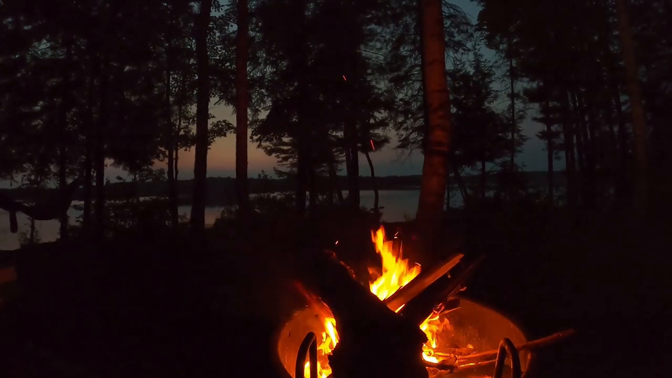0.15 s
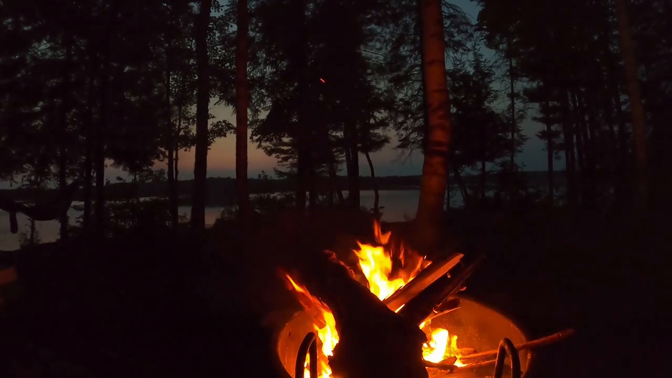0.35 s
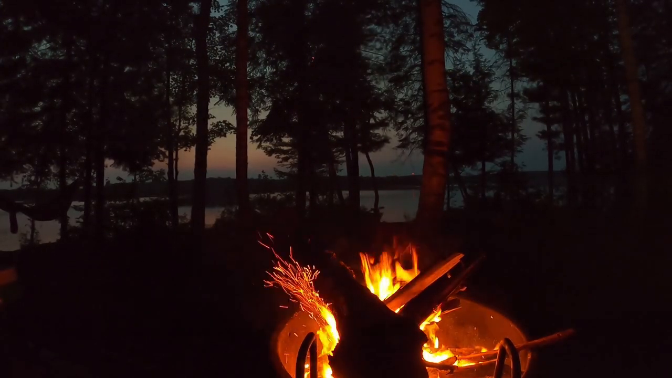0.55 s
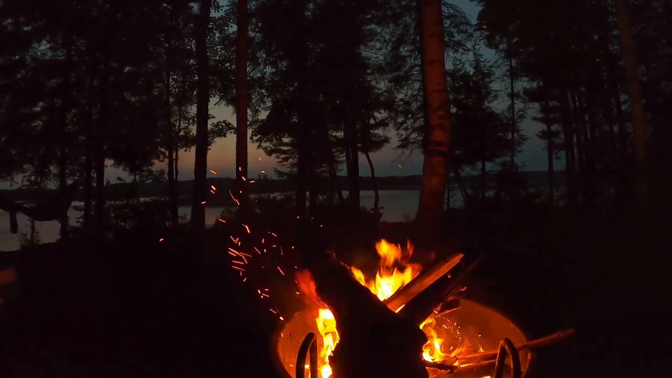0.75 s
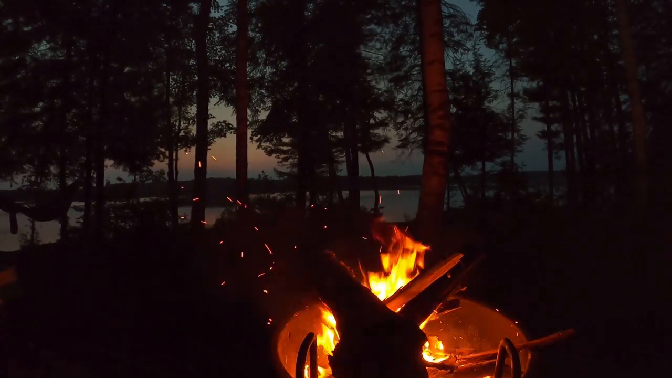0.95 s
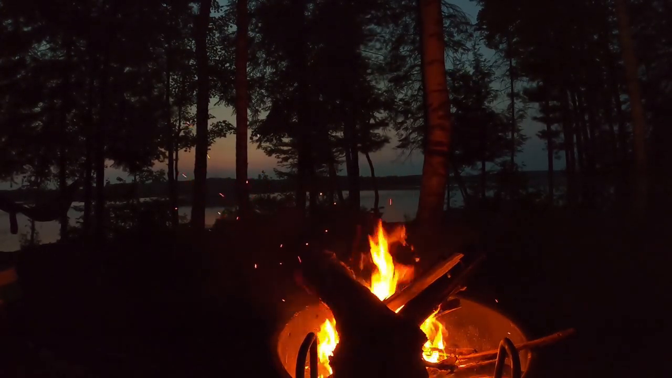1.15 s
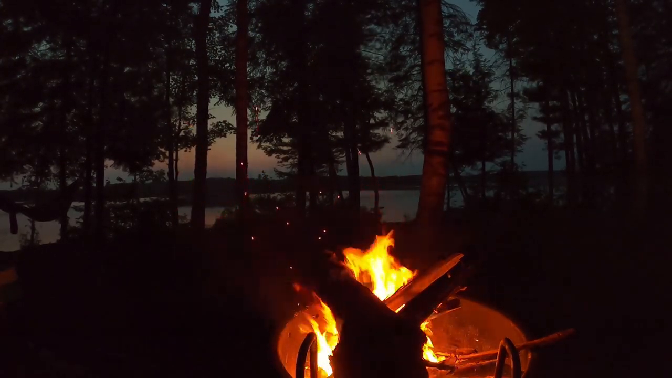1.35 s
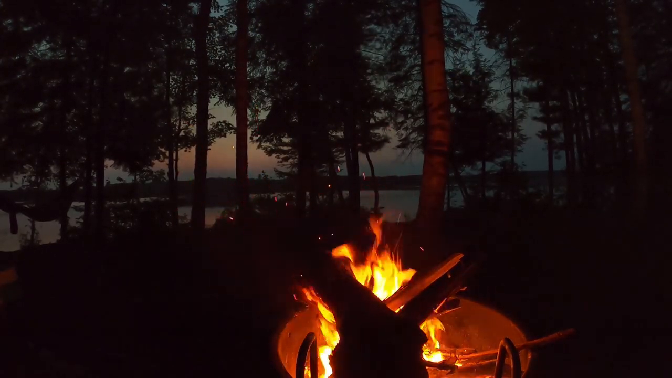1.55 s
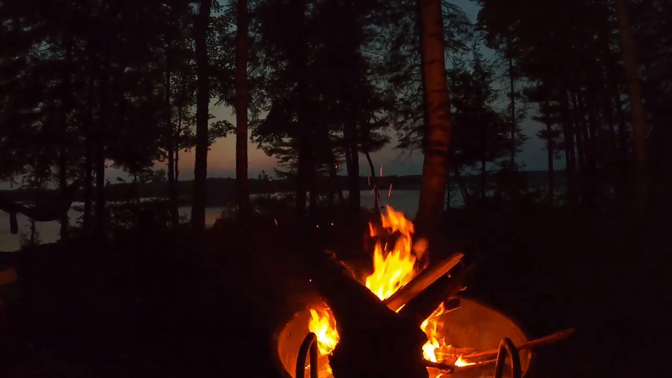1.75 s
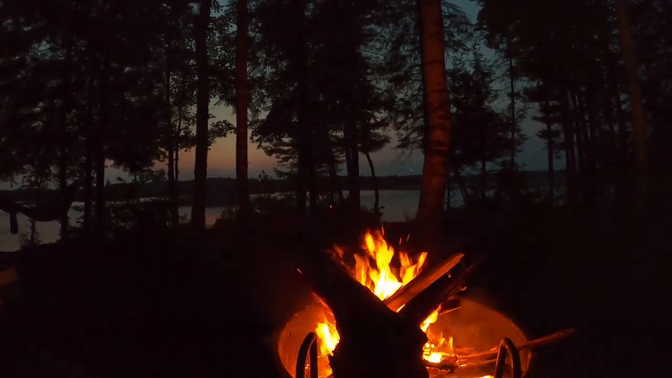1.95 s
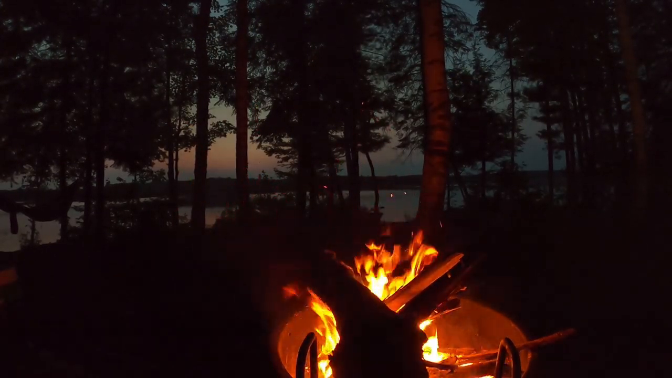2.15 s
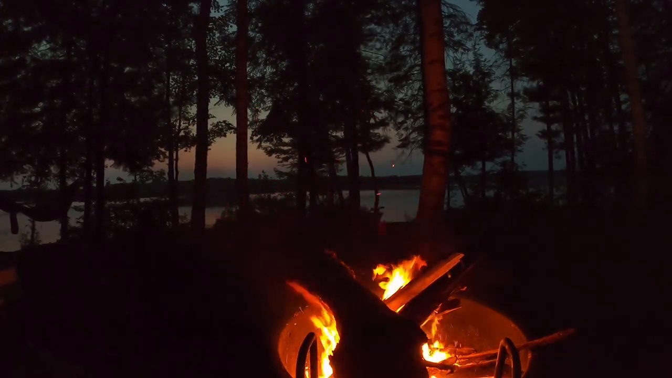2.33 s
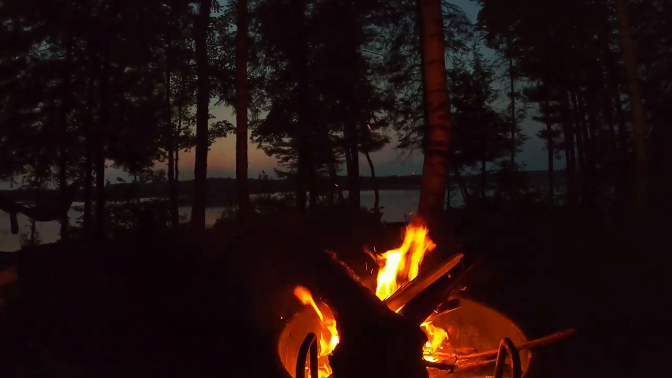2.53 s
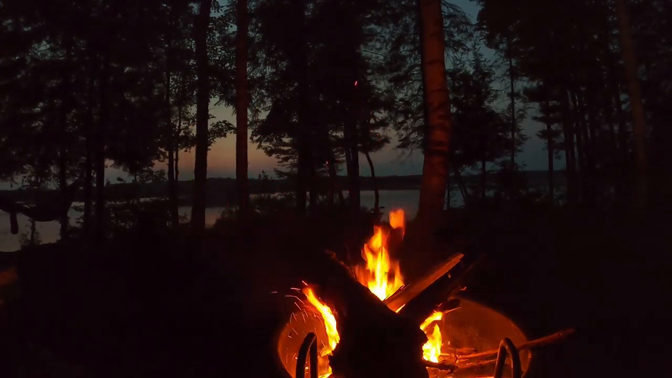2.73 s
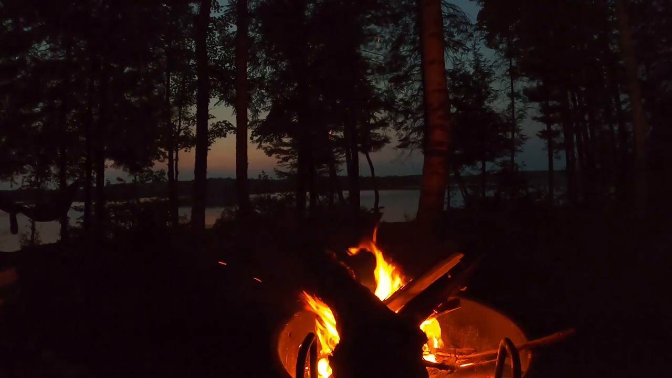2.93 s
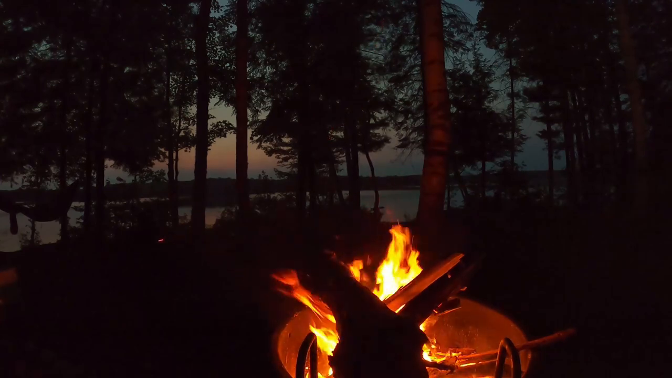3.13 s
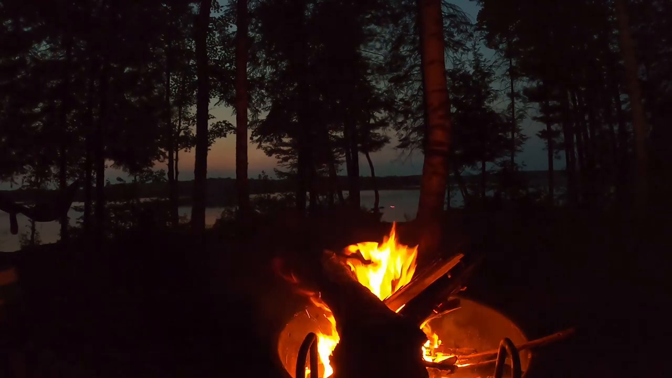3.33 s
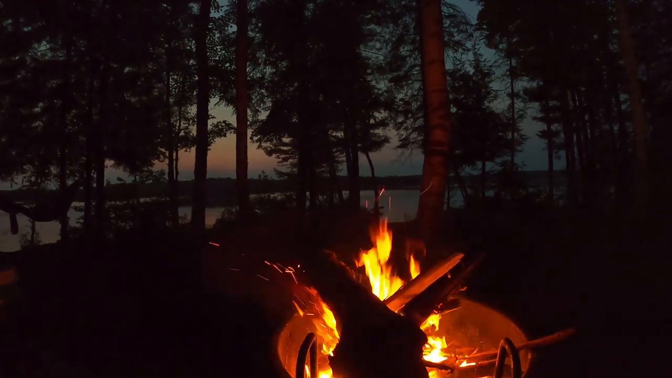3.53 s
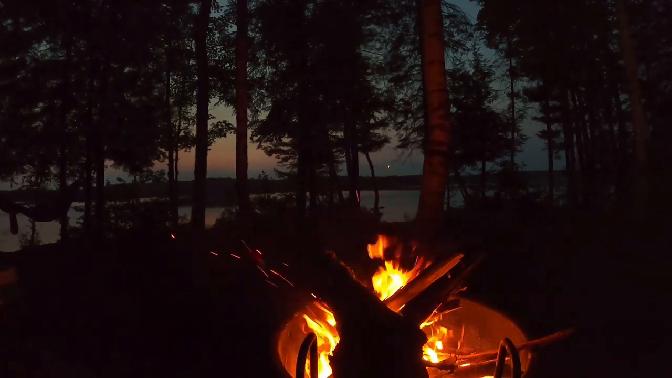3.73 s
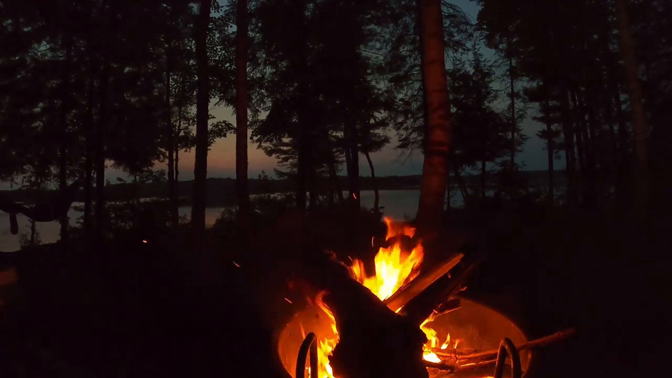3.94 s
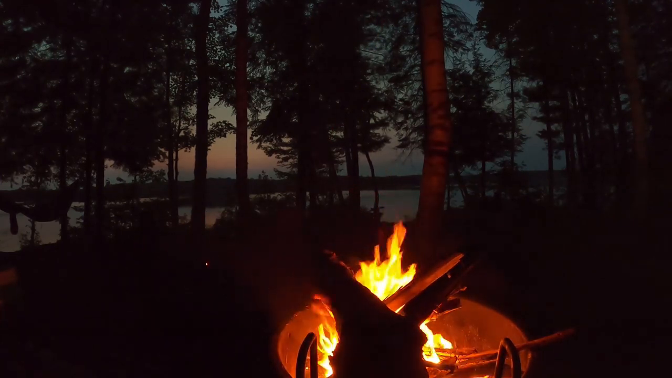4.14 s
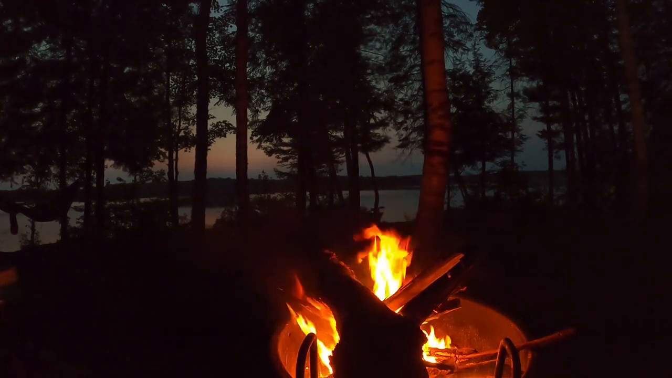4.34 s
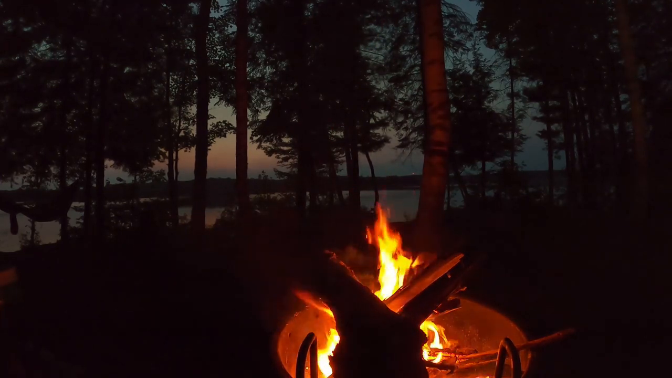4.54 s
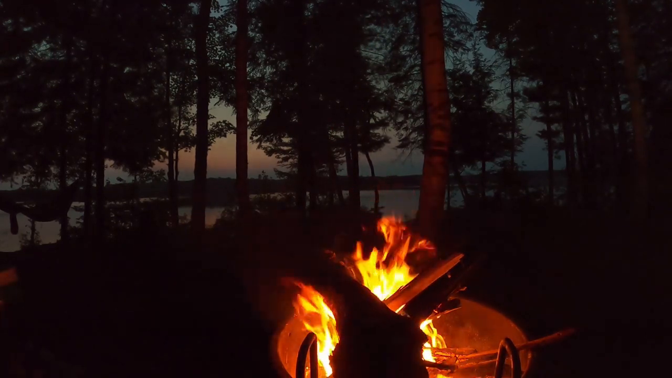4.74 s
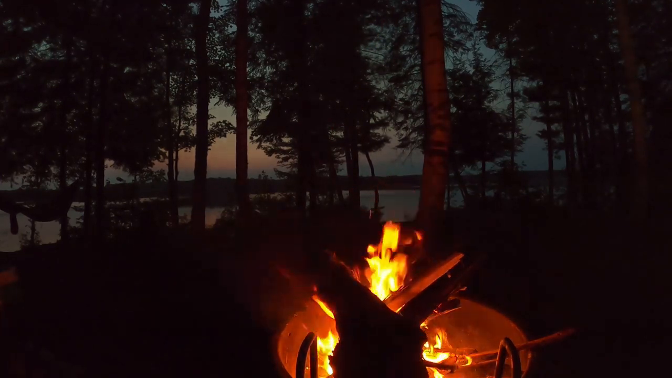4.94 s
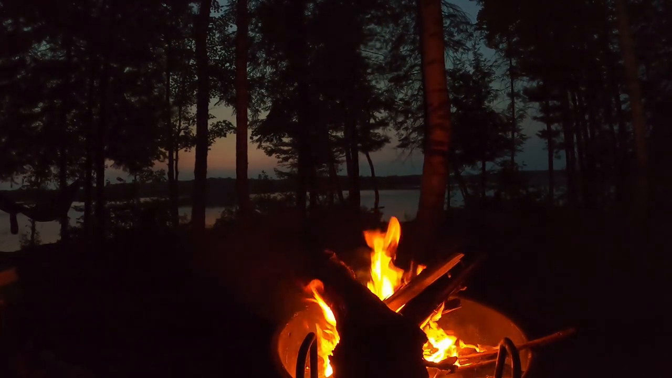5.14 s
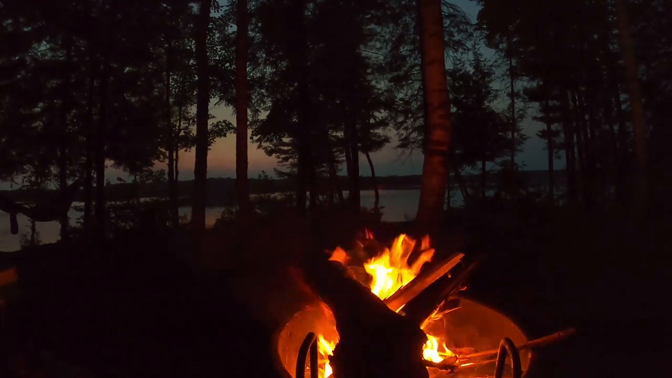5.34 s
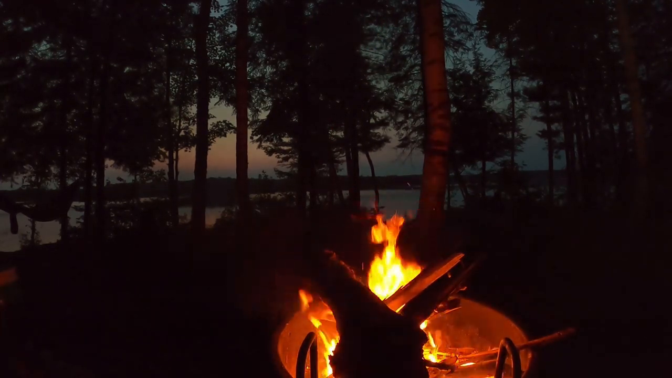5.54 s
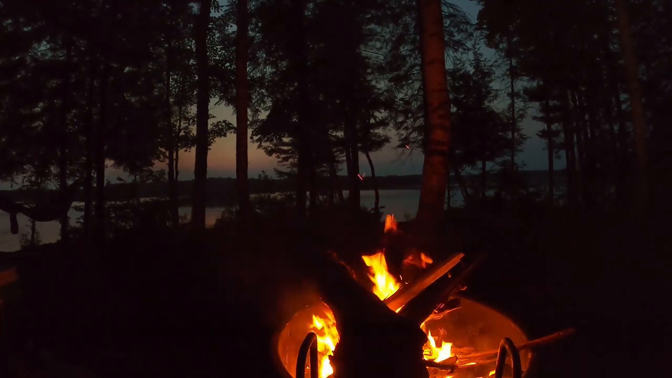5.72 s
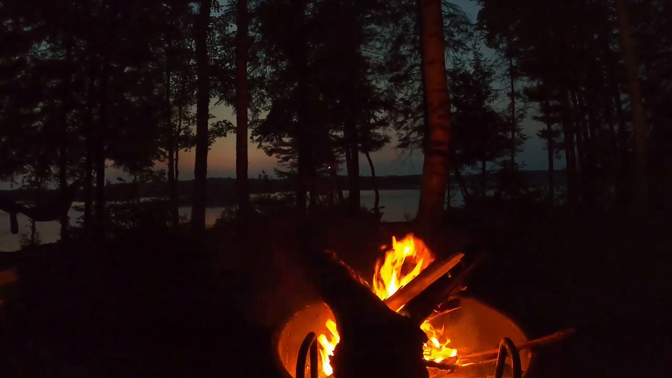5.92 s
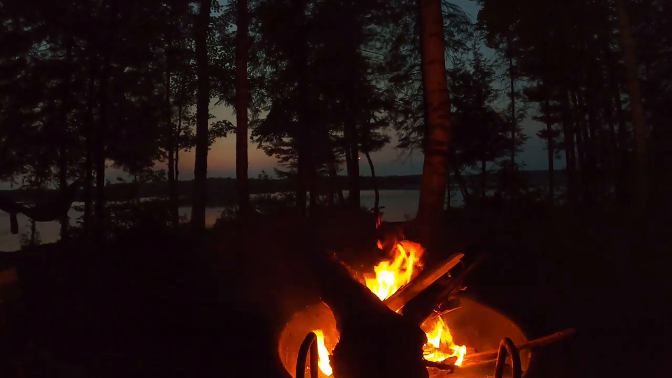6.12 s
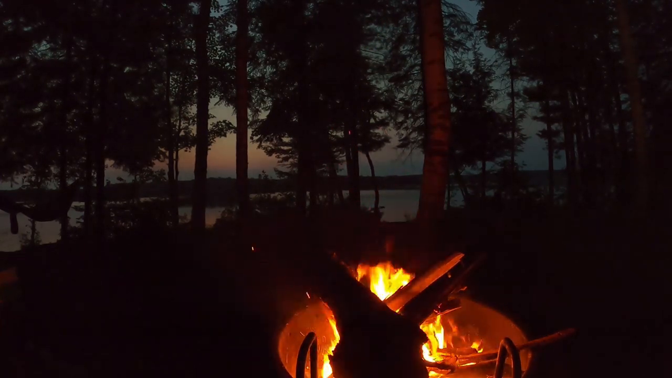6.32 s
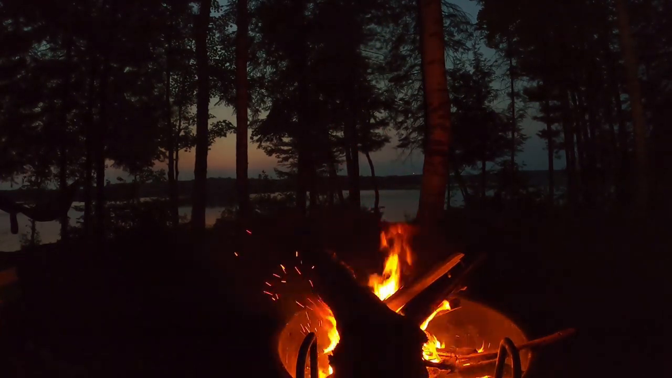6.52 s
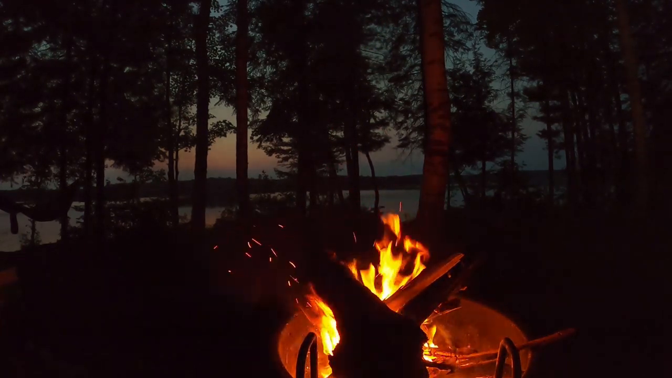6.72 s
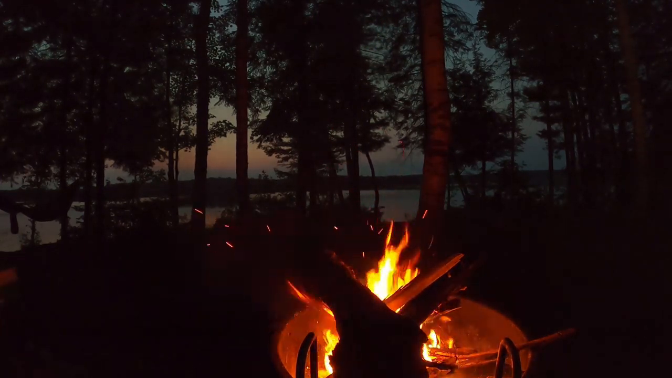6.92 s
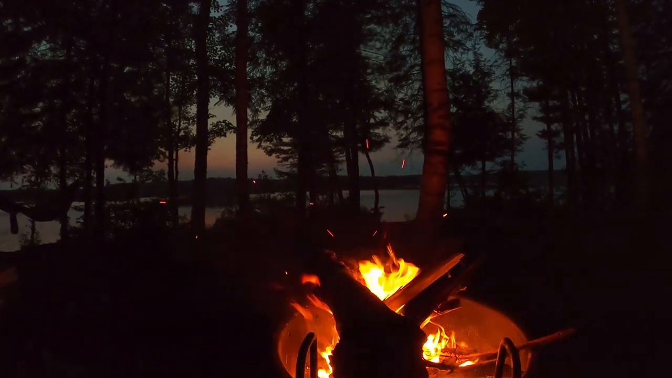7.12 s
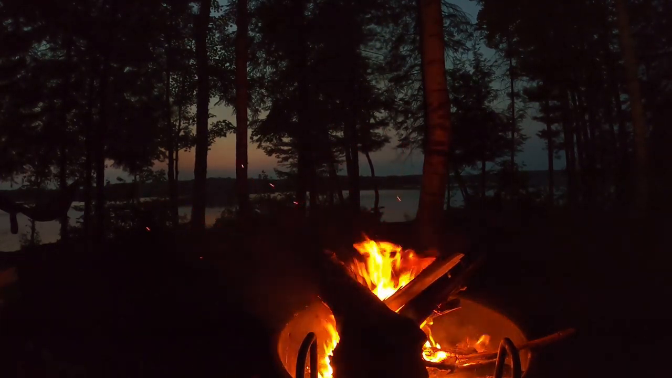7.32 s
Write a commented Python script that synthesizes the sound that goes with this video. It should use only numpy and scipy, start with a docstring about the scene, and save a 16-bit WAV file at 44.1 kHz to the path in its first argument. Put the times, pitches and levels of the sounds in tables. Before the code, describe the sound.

Close stereo campfire in a quiet forest at dusk. Bright snaps open the scene, with a strong pair just after half a second, then scattered pops and small knocks. Midway, logs knock in a quick tumbling run; later one loud woody thunk and two very sharp cracks stand out before small ticks and another knock. Beneath lies a soft unsteady rumble of flames with a faint hiss; loud snaps leave brief diffuse tails among the trees.

```python
"""Wood fire among trees

A wood fire burns in a steel ring in a still forest, heard close by in stereo, just right of centre.
Shaped noise makes the rumbling, fluttering flames and the hiss, with its soft puffs.
Short noise bursts make dry snaps, as steam bursts in the logs, and tiny ticks; the forest scatters the snaps.
Duller knocks add ringing log tones and a spray of noise that lingers; a thin electronic whine lies below."""
import sys
import numpy as np
from scipy import signal
from scipy.fft import rfft, irfft, next_fast_len
from scipy.io import wavfile
from scipy.ndimage import uniform_filter1d

SR = 44100
rng = np.random.default_rng(int(sys.argv[2]) if len(sys.argv) > 2 else 0)


def master_out(mix):
    """Clip the mix to full scale and print it as 16-bit PCM to the path in sys.argv[1]."""
    frames = np.transpose(np.atleast_2d(mix))
    ceiling = np.clip(frames, -1, 1)
    pcm = np.round(ceiling * 32767).astype(np.int16)
    wavfile.write(sys.argv[1], SR, pcm)


N = 329471
TIME = np.arange(N) / SR  # seconds
EDGE_HZ = 16400  # upper limit of the sound

# thin whine of electronics: pitch_hz, level_db
WHINE = [(5529, -87), (11058, -103)]
# colour of the hiss, relative: frequency_hz, level_db_per_hz
HISS_COLOUR = [(200, -34.5), (500, 9), (900, -5), (1200, 3.5), (1750, -3.5), (2500, -3.5), (3250, 0),
               (3900, -8), (5700, -10), (6400, -9), (7800, -14.5), (8800, -19), (11800, -27), (16000, -44)]
# soft puffs of hiss, before the waver: crest_s, level_db, length_s, centre_hz
PUFFS = [(0.49, -58.5, 0.083, 4000), (1.002, -67, 0.061, 2380), (4.035, -64.5, 0.054, 2750),
         (5.927, -63, 0.046, 673), (5.973, -56.5, 0.038, 1530)]
# strength of the flames, before the overall offset and flutter: time_s, level_db
FLAME_LEVEL = [(0.0, -46), (0.71, -53), (1.56, -44), (1.74, -51), (2.64, -46), (3.12, -49), (3.27, -46),
               (3.74, -52.5), (4.49, -46), (4.64, -54.5), (4.85, -50.5), (5.12, -46.5), (5.53, -49),
               (5.76, -51), (6.22, -49), (6.76, -52.5), (7.07, -50.5), (7.47, -48)]
# colour of the flames, relative: frequency_hz, level_db_per_hz
RUMBLE_COLOUR = [(12, -27.5), (25, 2), (55, 0), (85, 2.5), (105, -3), (130, -0.5), (152, -6.5), (178, -3),
                 (230, -8.5), (290, -17.5), (390, -18.5), (520, -41), (900, -43.5), (2000, -69)]
# colour of what the trees scatter, relative: frequency_hz, level_db_per_hz
FOREST_COLOUR = [(100, -19.5), (700, -23.5), (1400, -10), (2400, 0.5), (3300, 6), (4000, 0.5), (4900, 2.5),
                 (6000, -0.5), (8000, -6.5), (9200, -14), (12500, -22), (16000, -41.5)]
# time the scattered sound takes to fall by 60 dB: frequency_hz, t60_s
FOREST_T60 = [(200, 0.59), (1500, 0.26), (3200, 0.46), (8000, 0.71), (16000, 0.15)]
# loud wooden knocks, before the offsets in knocks(): start_s, woody_body_db, crack_db
KNOCKS = [(1.201, -57, -62.5), (2.0569, -54, -53.5), (2.074, -57, -68), (2.5509, -46.5, -50),
          (3.38, -46.5, -59), (3.933, -55, -65.5), (4.364, -47.5, -45.5), (4.434, -40, -43.5),
          (4.4878, -44.5, -45), (4.524, -45, -45.5), (4.542, -51, -50.5), (4.593, -48.5, -54),
          (4.627, -53, -64), (4.984, -62.5, -72), (5.0443, -51.5, -60), (5.168, -59.5, -65),
          (5.271, -64.5, -58), (5.4763, -64, -57), (5.499, -58, -57), (5.608, -50.5, -54),
          (5.7631, -64.5, -58.5), (5.7854, -67.5, -69), (6.004, -34.5, -27), (6.606, -54, -52),
          (6.618, -49.5, -56), (6.638, -57.5, -56.5), (6.95, -38, -40), (7.2397, -54.5, -53.5)]
# colour of a knock, relative: frequency_hz, level_db
KNOCK_COLOUR = [(100, -4), (480, 9.5), (700, 4), (1100, 3), (1600, 1.5), (2300, 3), (3300, 5), (4200, -3),
                (5500, -8.5), (8000, -18.5), (10000, -31.5), (13500, -37), (16000, -59.5)]
# ring of a knocked log, relative, before random changes of pitch: pitch_hz, level_db, t60_s
LOG_MODES = [(341, 2, 0.084), (502.6, 1.5, 0.069), (777, -6, 0.086), (1047, 0, 0.049), (1460, -7, 0.055),
             (2050, -5.5, 0.086)]
# low ring of the fire pit, relative, before random changes: pitch_hz, level_db, t60_s
PIT_MODES = [(84, -4.5, 0.065), (133, -1, 0.045), (180, -2.5, 0.051), (228, 2.5, 0.036)]
# loud snaps: start_s, crack_db, woody_body_db, sizzle_db, thump_db, tear_s (time the fibres take to tear)
SNAPS = [(0.0883, -36, -46.5, -42.5, -41.5, 0.0015), (0.1623, -25, -30, -24.5, -55, 0.002),
         (0.1725, -30, -31, -34, -35.5, 0.0011), (0.602, -19, -32.5, -18.5, -38.5, 0.0014),
         (0.6994, -24, -39.5, -30, -54, 0.0019), (1.5071, -32.5, -45.5, -44, -46, 0.0016),
         (1.5795, -45.5, -34.5, -60.5, -34, 0.0023), (1.6491, -45, -65, -49.5, -50.5, 0.0013),
         (1.6773, -38.5, -48.5, -47.5, -45, 0.0025), (2.3399, -31.5, -38.5, -43, -36.5, 0.0022),
         (2.5374, -42.5, -60, -47, -73, .0035), (2.569, -37, -50, -47.5, -39, 0.002),
         (2.672, -24.5, -30, -34.5, -37.5, 0.0015), (2.7192, -40.5, -52, -41.5, -46, .0037),
         (2.823, -52, -62.5, -62, -55, 0.0013), (3.2364, -38, -60, -39, -56, 0.0013),
         (3.3148, -38, -53, -38.5, -67, 0.0016), (3.3778, -23, -38.5, -33.5, -34.5, 0.0023),
         (4.3716, -33, -65, -40.5, -62, 0.0015), (4.8997, -37, -55, -48.5, -70, 0.0023),
         (5.324, -29.5, -44, -40, -47, 0.0013), (5.5886, -39.5, -68, -49.5, -55, 0.0012),
         (5.6619, -43, -53.5, -51, -67, 0.0018), (6.3833, -20, -30, -40, -37, 0.0014),
         (6.4145, -15.5, -34, -17, -30, 0.0024), (6.822, -48, -60, -51, -55, 0.0018),
         (6.8715, -51.5, -71, -65, -62, 0.0015), (7.1728, -55.5, -62, -58.5, -65, 0.0029),
         (7.2539, -46.5, -62, -51.5, -58, 0.002), (7.32, -40, -61, -47, -61, 0.005),
         (7.3987, -44, -54.5, -46, -55, .0019)]
# colour of a snap, relative: frequency_hz, level_db
SNAP_COLOUR = [(100, -2.5), (400, 1), (650, 0.5), (1200, 4.5), (1750, 0.5), (2300, 3.5), (3200, 5),
               (4000, -1), (4900, 1.5), (5900, -6), (7000, -2), (8000, -3), (9000, -13), (13500, -24),
               (16000, -29)]
# pitch of the breaking piece, read from how far the woody body stands over the crack: body_over_crack_db,
# splinter_hz
SPLINTER = [(-16.5, 2964), (0.5, 2600), (-6, 1080), (8, 590)]
# bands for setting levels (low, woody body, crack, sizzle): from_hz, to_hz
BANDS = [(50, 300), (300, 1700), (1700, 5500), (5500, 16000)]
# how alike left and right are in diffuse sound (1 = same, negative = opposed): frequency_hz, likeness
LIKENESS = [(25, 0.35), (70, 0.96), (290, 0.89), (640, 0.82), (1400, .66), (3100, 0.3), (6800, -0.28),
            (15000, -0.079)]
# left level minus right level in diffuse sound: frequency_hz, difference_db
DIFFUSE_LR = [(60, 0), (380, -2), (1300, 0), (2400, 4), (4400, 4), (8100, -6), (15000, -0.5)]
# left level minus right level in direct sound: frequency_hz, difference_db
DIRECT_LR = [(60, 0), (700, 0), (1500, -0.5), (3000, 2), (5300, 1.5), (6400, -11.5), (7200, -10.5),
             (8000, -22), (10000, -13.5), (12000, -10), (16000, -6)]


def amp(db):
    """Turns decibels into gain."""
    return 10 ** (np.asarray(db) / 20)


def evened(x):
    """Scales a sound to rms 1."""
    return x / np.sqrt(np.mean(x ** 2) + 1e-20)


def read(points, hz):
    """Reads a table between its points, on a log-frequency axis."""
    f, value = np.transpose(points)
    return np.interp(np.log(hz + 1), np.log(f + 1), value)


def add(mix, start_s, sound):
    """Mixes a sound in at its start time."""
    part = mix[max(round(start_s * SR), 0):][:len(sound)]
    part += sound[:len(part)]


def colour(x, points):
    """Filters to a given spectrum, with no sound ahead of its cause (minimum phase)."""
    log_gain = np.log(amp(read(points, abs(np.fft.fftfreq(4096, 1 / SR)))))
    taps = np.fft.ifft(np.exp(np.conj(signal.hilbert(log_gain)))).real
    return signal.oaconvolve(x, taps[:len(taps) // 2])[:len(x)]


def band(x, edges):
    """Keeps the frequencies between two edges in Hz."""
    return signal.sosfilt(signal.butter(3, edges, "band", fs=SR, output="sos"), x)


def opening(x, db, seconds):
    """Gives the first moments of a hit the rms level db."""
    return amp(db) * x / np.sqrt(np.mean(x[:int(seconds * SR)] ** 2) + 1e-20)


def drift(rate_hz):
    """Makes a random wander of rms 1 that fades out around rate_hz."""
    hz = np.fft.rfftfreq(N, 1 / SR)
    return evened(irfft(rfft(rng.standard_normal(N)) * np.exp(-(hz / rate_hz) ** 2), N))


def ports(a, b, balance, lag=3.36):
    """Two microphone ports: b is the part they do not share; the left one hears lag samples later."""
    size = next_fast_len(N + 64)
    hz = np.fft.rfftfreq(size, 1 / SR)
    right = rfft(a, size)
    left = right * np.exp(-2j * np.pi * hz * lag / SR)
    if b is not None:
        same = np.clip(read(LIKENESS, hz), -1, 1)
        left = same * left + np.sqrt(1 - same ** 2) * rfft(b, size)
    ratio = amp(read(balance, hz))
    shared_gain = np.sqrt(2 / (1 + ratio ** 2))  # keeps the total power
    return irfft(np.array([left * ratio, right]) * shared_gain, size)[:, :N]


def whine():
    """Steady thin sine tones, alike in both channels."""
    return sum(np.sqrt(2) * amp(db) * np.sin(2 * np.pi * hz * TIME) for hz, db in WHINE)


def hiss(hiss_db=-68.5, waver_db=1.5, grain_db=1.0, skirt_db=-11):
    """A faint wavering noise that swells now and then in a broad puff."""
    waver = amp(waver_db * drift(7) + grain_db * drift(150))
    pair = []
    for _ in range(2):
        sound = amp(hiss_db) * evened(colour(rng.standard_normal(N), HISS_COLOUR))
        steam = colour(rng.standard_normal(N), HISS_COLOUR)
        for crest_s, db, length_s, hz in PUFFS:
            hump = [(hz / 4, 2 * skirt_db), (hz / 2, skirt_db / 2), (hz, 0),
                    (hz * 2, skirt_db / 2), (hz * 4, 2 * skirt_db)]
            swell = np.exp(-((TIME - crest_s) / length_s) ** 2 / 2)
            sound += amp(db) * swell * evened(colour(steam, hump))
        pair.append(waver * sound)
    return ports(*pair, DIFFUSE_LR, lag=1.5)


def flames(flame_db=1.5, flutter_db=2.0, surge_db=0.45, stir_db=-1.5, stir_top_db=-44, stir_s=0.052):
    """Turbulent burning gas: a low rumble that surges and flutters, and flares briefly at each loud knock."""
    power = amp(np.interp(TIME, *np.transpose(FLAME_LEVEL)) + flame_db) ** 2
    for start_s, body_db, _ in KNOCKS:
        age = np.maximum(TIME - start_s, 0) / stir_s
        flare = age * np.exp(1 - age)
        power = power + (amp(min(body_db + stir_db, stir_top_db)) * flare) ** 2
    level = np.sqrt(power) * amp(flutter_db * drift(36) + surge_db * drift(6))
    pair = [level * evened(colour(rng.standard_normal(N), RUMBLE_COLOUR)) for _ in range(2)]
    return ports(*pair, DIFFUSE_LR)


def forest(forest_db=-30.0, rise_s=0.012, hold_s=.07, bright_share=0.93,
           far_db=-5.5, far_s=0.12, far_width_s=.045):
    """Trees scatter each loud snap into a spray that swells, holds and dies; farther trees answer later."""
    hz, t, noise = signal.stft(rng.standard_normal((2, N)), SR, nperseg=256)
    t60 = read(FOREST_T60, hz)[:, None]
    power = np.zeros(noise.shape[1:])
    for start_s, crack_db, _, sizzle_db, _, _ in SNAPS:
        now = (t > start_s) & (t < start_s + 1)
        age = t[now] - start_s
        # bright snaps burst in the open and carry best
        db = crack_db + bright_share * (sizzle_db - crack_db)
        near = amp(-60 * np.maximum(age - hold_s, 0) / t60)
        far = amp(far_db) * np.exp(-((age - far_s) / far_width_s) ** 2 / 2)
        power[:, now] += (amp(db) * (1 - np.exp(-age / rise_s))) ** 2 * (near ** 2 + far ** 2)
    tint = evened(amp(read(FOREST_COLOUR, hz)))[:, None]
    spray = signal.istft(noise * np.sqrt(power) * tint, SR)[1][:, :N]
    return amp(forest_db) * ports(*spray, DIFFUSE_LR, lag=0)


def ticks(per_s=9, tick_db=-53, spread_db=3.5):
    """Tiny cracks in the embers: very short noise bursts, each with its own pitch."""
    out, t = np.zeros(N), np.arange(400) / SR
    for when, size, pitch, chance in rng.random((300, 4)):
        burst = rng.standard_normal(len(t)) * np.exp(-t / 0.0009)
        hz = 700 * 6 ** pitch
        if chance < per_s * N / SR / 300:  # keeps about per_s ticks a second
            gain = amp(tick_db + spread_db * np.log(size + .05))  # before the filters
            add(out, when * N / SR, band(burst, (hz, 3 * hz)) * gain)
    return colour(out, SNAP_COLOUR)


def thump(db, rise_s=0.0024, top_hz=215):
    """A push rings the low modes of the pit, each a fading sine with a slightly random pitch and level."""
    t, ring = np.arange(SR // 4) / SR, 0
    for hz, mode_db, t60 in PIT_MODES:
        fade = amp(mode_db + 2 * rng.standard_normal() - 60 * t / t60)
        ring = ring + fade * np.sin(2 * np.pi * hz * rng.uniform(.92, 1.08) * t)
    return opening(band(ring * (1 - np.exp(-t / rise_s)), (30, top_hz)), db, 0.031)


def log_ring(t):
    """The modes of one log: fading sines, with pitches that change with its random size."""
    size, ring = rng.uniform(0.93, 1.1), 0
    for hz, db, t60 in LOG_MODES:
        tone = np.sin(2 * np.pi * hz * size * rng.uniform(.93, 1.2) * t)
        ring = ring + amp(db - 60 * t / t60) * tone * rng.choice([-1, 1])
    return ring


def faint_knocks(count=5, body_db=-71, crack_db=-76, spread_db=6):
    """Small pieces shift in the embers at random moments; rows as in KNOCKS."""
    return [(when * N / SR, body_db + spread_db * size, crack_db + spread_db * size)
            for when, size in rng.random((count, 2))]


def knocks(blow_s=0.0057, body_offset_db=-2.5, modes_db=-4.5, push_db=-7, push_slope=0.66, thump_db=-7.0,
           boom_db=-3.0, boom_t60=0.26, ring_db=-11.5, body_t60=0.23, crack_t60=0.51):
    """A blunt, splintery blow rings a log; a diffuse tail follows that lasts longest in the treble."""
    blows, rings, t = np.zeros(N), np.zeros((2, N)), np.arange(SR // 2) / SR
    for start_s, body_db, crack_db in list(KNOCKS) + faint_knocks():
        low_db = push_db + push_slope * body_db  # a harder knock shakes the pit more
        splinters = uniform_filter1d(rng.standard_normal(len(t)), size=90)
        splinters = evened(uniform_filter1d(splinters, size=16))
        grain = amp(3.5 * splinters * np.exp(-t / .06))
        # one noise for the blow, two for the left and right tail
        noise = grain * np.array([colour(rng.standard_normal(len(t)), KNOCK_COLOUR) for _ in range(3)])
        parts = ((BANDS[1], body_db + body_offset_db, body_t60),
                 ((BANDS[2][0], BANDS[3][1]), crack_db, crack_t60))
        for edges, db, t60 in parts:
            first, *late = band(noise, edges)
            blow = first * (1 - np.exp(-t / 0.0013)) * np.exp(-t / blow_s)
            tail = np.array(late) * (1 - np.exp(-t / 0.0032)) * amp(ring_db - 60 * t / t60)
            gain = amp(db) / np.std((blow + tail[0])[:SR * 3 // 100])  # level over the first 30 ms
            add(blows, start_s, gain * blow)
            for side, sound in zip(rings, tail):
                add(side, start_s, gain * sound)
        for side in rings:
            boom = band(rng.standard_normal(len(t)), (85, 225)) * amp(-60 * t / boom_t60)
            add(side, start_s, opening(boom, low_db + boom_db, 0.03))
        add(blows, start_s, opening(log_ring(t), body_db + modes_db, 0.042))
        add(blows, start_s, thump(low_db + thump_db))
    return ports(blows, None, DIRECT_LR) + ports(*rings, DIFFUSE_LR, lag=0.71)


def faint_snaps(count=13, top_db=-57, range_db=10, decay_s=.0014):
    """Small pockets of steam burst at random moments, too weak to shake the pit."""
    out, t = np.zeros(N), np.arange(SR // 50) / SR
    for when, size in rng.random((count, 2)):
        burst = colour(rng.standard_normal(len(t)) * np.exp(-t / decay_s), SNAP_COLOUR)
        add(out, when * N / SR, opening(burst, top_db - range_db * size, 0.0085))
    return out


def snaps(spike=5.4, ground_db=-26, ground_s=0.022, tilt=.55, splinter_db=5,
          sliver_slope=1.6, sliver_from_db=-22, sliver_hz=4800):
    """Steam bursts a log: a sharp break and a few ms of tearing fibres, with a push of escaping gas."""
    out, t = np.zeros(N), np.arange(SR // 12) / SR
    for start_s, crack_db, body_db, sizzle_db, low_db, tear_s in SNAPS:
        # logs and ground scatter briefly
        shape = np.exp(-t / tear_s) + amp(ground_db) * np.exp(-t / ground_s)
        burst = rng.standard_normal(len(t)) * shape
        burst[0] += spike
        # a buried snap is dark all through, an open one bright up to the top
        slope = [(600, tilt * (body_db - crack_db + 11.5)), (2200, 0.0034),
                 (4000, 0), (14000, tilt * (sizzle_db - crack_db - 4.0))]
        # the piece that breaks rings for a few cycles
        hz = np.interp(body_db - crack_db, *np.transpose(SPLINTER))
        splinter = [(hz / 1.25, 0), (hz, splinter_db), (hz * 1.4, 0)]
        # the hardest breaks also ring a thin sliver
        sliver_db = sliver_slope * max(crack_db - sliver_from_db, 0)
        sliver = [(sliver_hz / 1.5, 0), (sliver_hz, sliver_db), (sliver_hz * 1.15, 0)]
        for spectrum in (SNAP_COLOUR, slope, splinter, sliver):
            burst = colour(burst, spectrum)
        for edges, db in zip(BANDS[1:], (body_db, crack_db, sizzle_db)):
            add(out, start_s, opening(band(burst, edges), db, 0.0087))
        add(out, start_s, thump(low_db))
    return out


def scene():
    """The fire just right of centre, with the forest around it."""
    background = whine() + hiss() + flames() + forest()
    cracks = ports(ticks() + faint_snaps() + snaps(), None, DIRECT_LR)
    return background + knocks() + cracks


def record(dry):
    """Cuts off peaks beyond full scale, then removes what lies above the upper frequency limit."""
    low_pass = signal.firwin(255, EDGE_HZ, window=("kaiser", 9), fs=SR)
    return signal.oaconvolve(np.clip(dry, -1, 1), low_pass[None], "same")


dry = scene()
out = record(dry)
master_out(out)
```